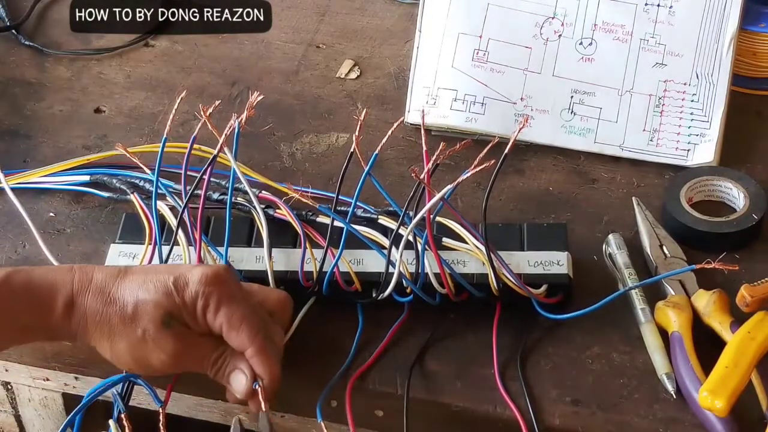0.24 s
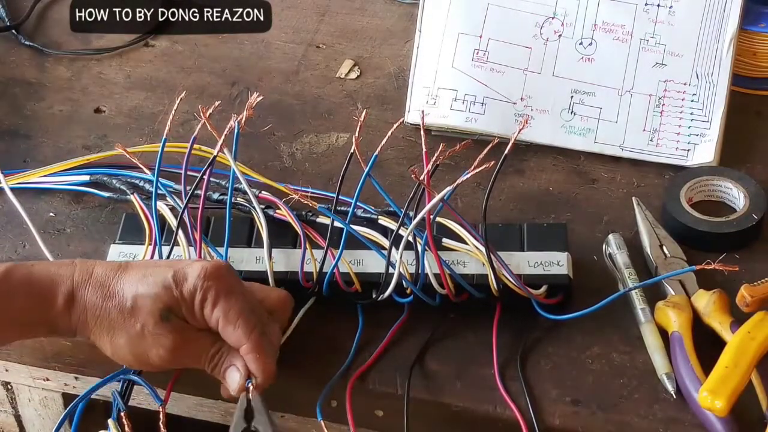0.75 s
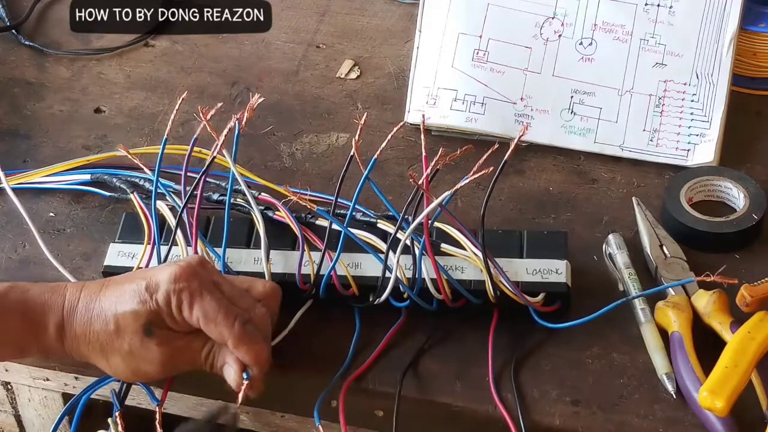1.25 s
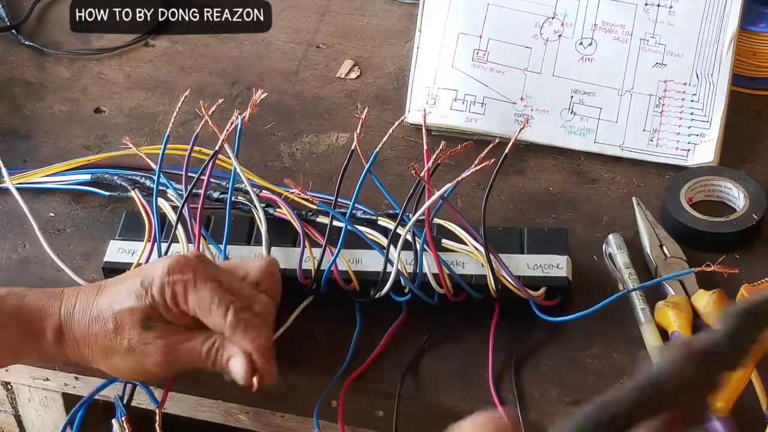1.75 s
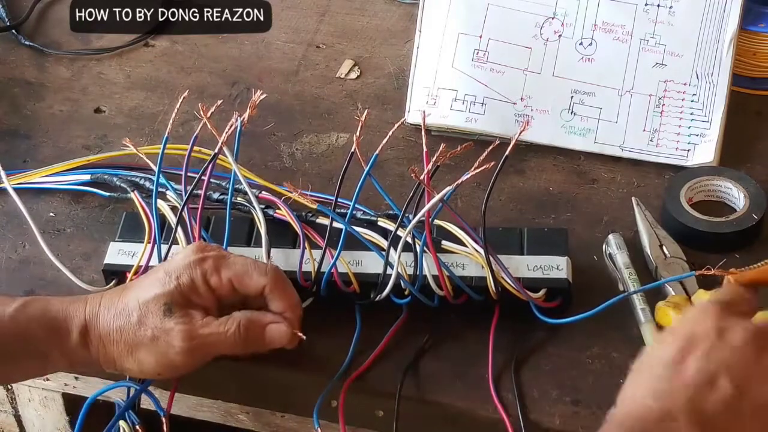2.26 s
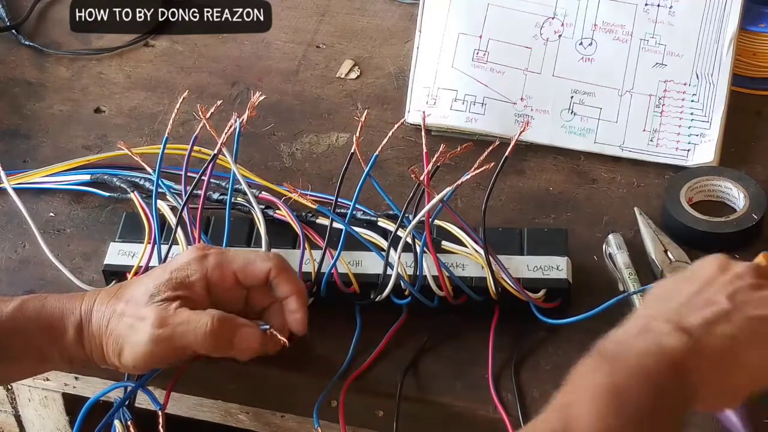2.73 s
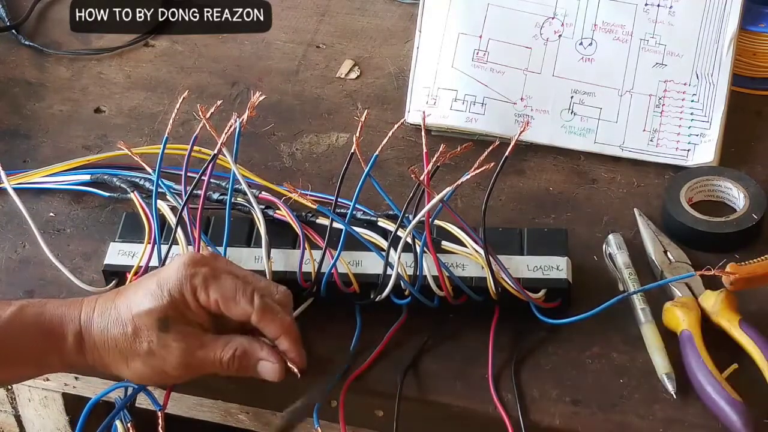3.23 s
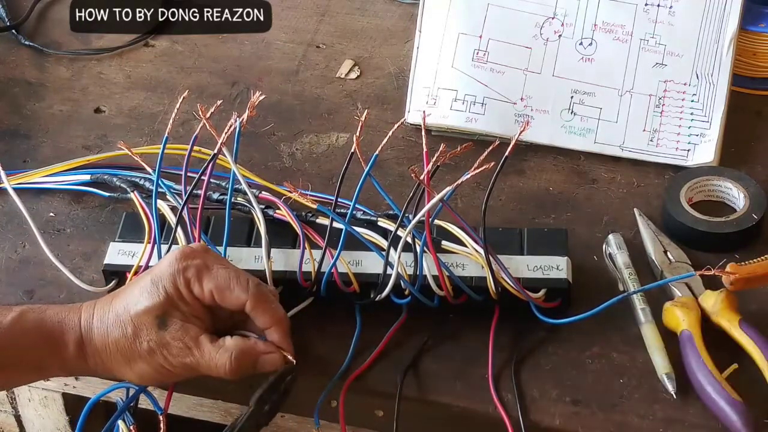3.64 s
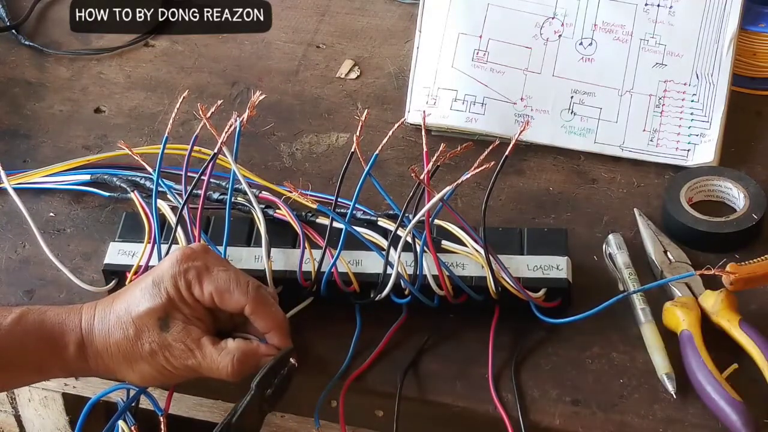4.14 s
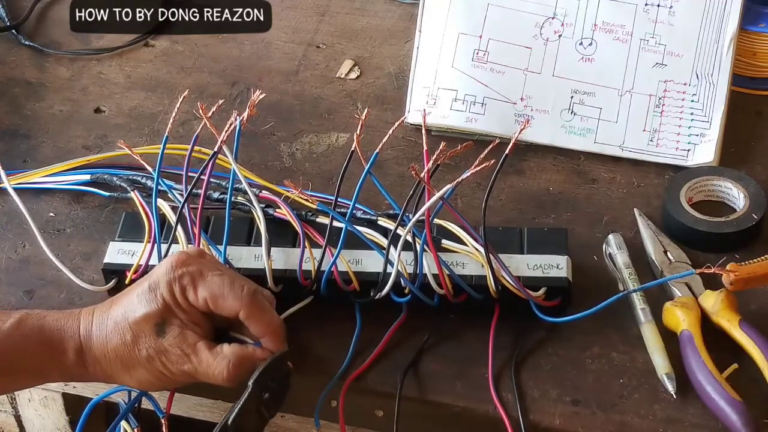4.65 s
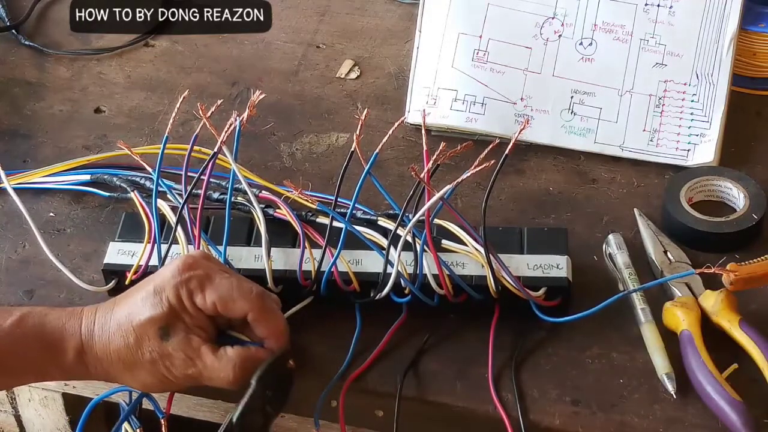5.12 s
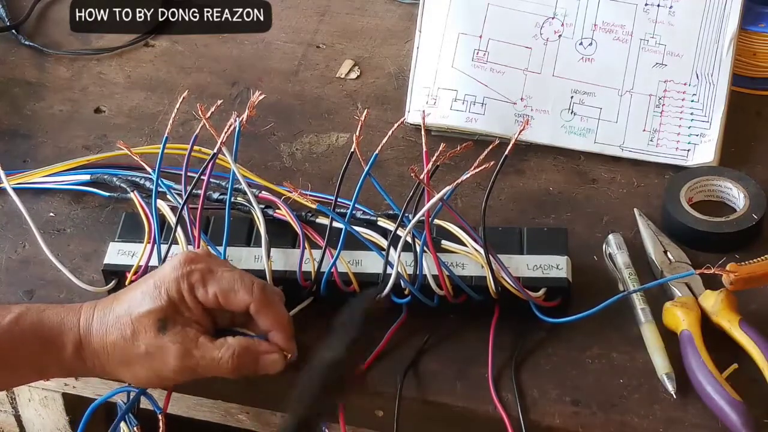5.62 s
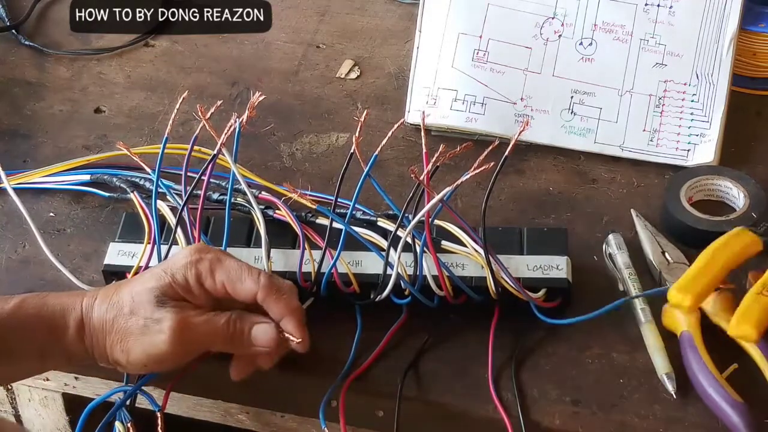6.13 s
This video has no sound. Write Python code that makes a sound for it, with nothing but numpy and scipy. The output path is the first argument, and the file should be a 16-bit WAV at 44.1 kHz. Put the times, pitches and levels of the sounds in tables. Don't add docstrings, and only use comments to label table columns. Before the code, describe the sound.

Open roadside workshop, stereo microphones close to a wooden bench. A vehicle rumbles away over faint town hum as pliers snip wire with a crisp click. At about two seconds a tool drops with a loud woody clatter and steel scrape, followed by small rattles. Later a rough engine approaches from the left, swelling strongly to the end, with a last knock as a tool is lifted.

```python
import sys
import numpy as np
from scipy import signal
from scipy.io import wavfile
from scipy.ndimage import uniform_filter1d, minimum_filter1d, map_coordinates

SR = 44100
rng = np.random.default_rng(int(sys.argv[2]) if len(sys.argv) > 2 else 0)


def wav_record(signal):
    frames = np.transpose(np.atleast_2d(signal))
    bounded = np.clip(frames, -1, 1)
    quanta = np.round(bounded * 32767).astype(np.int16)
    wavfile.write(sys.argv[1], SR, quanta)


def to_linear_factor(level_db):
    exponent = np.asarray(level_db, float) / 20
    return 10 ** exponent


N = 281358


def rms_one(x):
    return x / np.sqrt(np.mean(x ** 2) + 1e-20)


def in_time(rows):
    s, *columns = np.transpose(rows)
    return [np.interp(np.arange(N) / SR, s, c) for c in columns]


def at_hz(points, hz):
    points_hz, points_db = np.transpose(points)
    return np.interp(np.log(hz), np.log(points_hz), points_db)


def drift(rate, size=1):
    r = np.exp(-80 * np.pi * rate / SR)
    draw = rng.standard_normal(N // 40 + 2002)
    slow = signal.lfilter([1], [1, -2 * r, r * r], draw)[2000:]
    return np.interp(np.arange(0, N, size) / 40, np.arange(len(slow)), rms_one(slow))


def band(x, low_hz, high_hz):
    sos = signal.butter(2, [low_hz, min(high_hz, .45 * SR)], "band", fs=SR, output="sos")
    return signal.sosfilt(sos, x + 1e-18)


def ring(x, hz, t60):
    r, w = to_linear_factor(-60 / (t60 * SR)), 2 * np.pi * hz / SR
    return signal.lfilter([.5, 0, -.5], [1, -2 * r * np.cos(w), r * r], x + 1e-18) / np.sin(w) * w


def two_ports(x, left_leads_ms):
    n, half = np.arange(N), left_leads_ms * SR / 2000
    left = map_coordinates(x, [n + half], order=3)
    right = map_coordinates(x, [n - half], order=3)
    return np.array([left, right])


def add(out, s, piece):
    at = round(s * SR)
    out[at:at + len(piece)] += piece[:N - at]


def burst(draw, ms, rise_ms):
    t_ms = np.arange(len(draw)) / SR * 1000
    x = draw * (1 - np.exp(-t_ms / rise_ms)) ** 2 * to_linear_factor(-20 * t_ms / ms)
    return x / np.abs(x).max()


def wind():
    level = to_linear_factor(-36 - 46 * np.arange(N) / SR)
    lumps = rms_one(band(rng.standard_normal((2, N)), 8.1, 186))
    return level * lumps * to_linear_factor(np.array([[-9], [3]]))


def engine(firing_hz, level_db, loudest_hz, orders):
    phase, lines = 2 * np.pi * np.cumsum(firing_hz) / SR, 0
    coarse = slice(0, N, 8)
    for k, db in orders:
        octave_off = np.log(k * (firing_hz / loudest_hz)[coarse]) / .25
        lift_db = 4.5 * np.exp(-octave_off ** 2)
        wander_db, slip = 2.3 * drift(2, size=8), .35 * drift(1.5, size=8)
        tone = np.sin(k * phase[coarse] + slip + 4 * rng.random())
        lines = lines + to_linear_factor(db + lift_db + wander_db) * tone
    exhaust = rms_one(signal.resample_poly(lines, 8, 1)[:N])
    return to_linear_factor(level_db + 1.5 * drift(9)) * exhaust, phase


def parts(loud_db, shares):
    nearest_db = loud_db.max()
    return [db + nearest_db + share * (loud_db - nearest_db) for db, share in shares]


def traffic():
    # time_s, loudness_db
    leaving = [(0.0, -46), (0.15, -50), (0.3, -54.5), (0.8, -59), (1.15, -69), (2.1, -70.5)]
    # time_s, firing_hz, loudness_db
    coming = [(3.4, 30.15, -68.5), (3.9, 30.4, -63), (4.25, 29.27, -57.5), (4.55, 30.83, -51.5),
              (4.75, 30.97, -50.5), (4.93, 31.3, -45.5), (5.17, 31.07, -42.5), (5.26, 30.57, -42),
              (5.4, 30.9, -36.5), (5.55, 31.06, -34), (5.8, 31.17, -33), (6.05, 31.07, -31),
              (6.33, 31.1, -32)]
    # multiple_of_firing, level_db
    leaving_orders = [(1, -4), (2, -5), (3, 0), (4, -3), (5, -10), (6, -9), (7, -14), (8, -11), (9, -15),
                      (10, -16)]
    coming_orders = [(1, -20), (2, -8), (3, -13), (4, -9), (5, -5), (6, -7), (7, -10), (8, -3), (9, -2),
                     (10, 0), (11, -4), (12, -3), (13, -1), (14, -5), (15, -5), (16, -3), (22, -9),
                     (24, -8), (25, -6), (26, -5), (27, -8), (31, -10)]
    leaving_parts = [
        (-1.5, 0.66),
        (1, 1.4),
        (0, 0.53),
        (1.5, 0.63),
    ]
    coming_parts = [
        (-3, 0.61),
        (-12.5, 0.78),
        (-1, 0.78),
        (-1.5, 0.75),
    ]
    # time_s, resonance_hz
    carries = [(4, 417), (5.3, 394), (5.75, 277), (6.38, 312)]
    # time_s, left_leads_ms
    bearing = [(0, .25), (1, .22), (3.4, .26), (4.9, .32), (5.3, .37), (5.42, .41), (5.65, .465),
               (5.95, .49), (6.1, .455), (6.22, .44), (6.36, .385)]
    # pitch_hz, density_db (per Hz)
    rolling = [(18, -61), (30, -30), (146, -24), (215, -25.5), (439, -1), (487, -5), (539, -4.5), (811, -2),
               (995, -3.5), (2140, -8), (3570, -10.5), (5810, -17), (10500, -31.5), (13500, -36)]
    far_hum = [(15, -54), (25, -7), (54, 0.5), (121, -1.5), (180, -5), (241, -2), (407, -2), (746, -6.5),
               (807, -10.5), (997, -13.5), (1920, -20), (4240, -15), (11200, -30), (13500, -32)]
    # pitch_hz, left_right_likeness (-1 to 1)
    likeness = [(60, 0.012), (180, 0.2), (520, 0.64), (1520, 0.52), (4480, 0.0087), (13200, 0.0066)]
    town_db = -49.5

    t = np.arange(N) / SR
    gone, come = np.clip((3.6 - t) / 0.62, 0, 1), np.clip((t - 3.2) / 0.28, 0, 1)
    (loud_a,), (hz_b, loud_b) = in_time(leaving), in_time(coming)
    engine_a, *road_a = parts(loud_a, leaving_parts)
    engine_b, *road_b = parts(loud_b, coming_parts)
    share = np.interp(np.maximum(loud_a, loud_b), [-60, -40], [.45, .92])
    tone_a, _ = engine(np.full(N, 45), engine_a, 175, leaving_orders)
    tone_b, phase = engine(hz_b, engine_b - 3, in_time(carries)[0], coming_orders)
    puff = 1 + .15 * np.cos(phase + .8 * drift(5))
    straight, scattered = gone * tone_a + come * tone_b, 0

    white, together = rng.standard_normal((2, 3, N)), drift(3.0)
    edges = 25 * 2 ** np.arange(0, 9.3, .4)
    centres = np.sqrt(edges[1:] * edges[:-1])
    part = np.digitize(centres, [220, 1300])
    widths = np.diff(edges)
    road = to_linear_factor(at_hz(rolling, centres)) ** 2 * widths
    town = to_linear_factor(at_hz(far_hum, centres)) ** 2 * widths
    powers = [(gone * to_linear_factor(a)) ** 2 + (come * puff * to_linear_factor(b)) ** 2 for a, b in zip(road_a, road_b)]
    for k, hz in enumerate(centres):
        one, mid, side = band(white[k % 2], edges[k], edges[k + 1]) * np.sqrt(SR / 2 / widths[k])
        road_share = road[k] / road[part == part[k]].sum()
        moving = powers[part[k]] * road_share * to_linear_factor(1.0 * together + 2.6 * drift(15))
        still = to_linear_factor(town_db) ** 2 * town[k] / town.sum()
        direct = share * min(1, (4300 / hz) ** 2.5)
        alike = np.clip(at_hz(likeness, hz), -1, 1)
        spread = np.sqrt(1 + alike) * mid + np.sqrt(1 - alike) * side * [[1], [-1]]
        straight = straight + np.sqrt(direct * moving) * one
        scattered = scattered + np.sqrt((1 - direct) * moving + still) * spread / np.sqrt(2)
    return two_ports(straight, in_time(bearing)[0]) + scattered


def legs():
    # start_s, peak_db
    thumps = [
        (2.213, -25.5),
        (6.352, -30),
    ]
    frame_hz, swell_s = 97, .02
    out, t = np.zeros(N), np.arange(SR // 2) / SR
    for s, db in thumps:
        swell = t / swell_s * np.exp(1 - t / swell_s)
        add(out, s, to_linear_factor(db) * swell * np.sin(2 * np.pi * frame_hz * t))
    return out


def sliding():
    # start_s, length_s, peak_db, fade_db_per_s, above_6khz_db
    strokes = [(0.763, 0.11, -44, 200, -14), (0.764, 0.012, -38, 200, -7), (0.926, 0.016, -43.5, 202, -15),
               (2.203, 0.016, -29, 300, -7), (2.22, 0.093, -33.5, 146, -1), (2.358, 0.028, -43, 100, -7),
               (2.43, 0.011, -47, 200, -5), (2.846, 0.024, -62, 200, 7), (2.889, 0.043, -52.5, 100, 2),
               (3.05, 0.06, -50, 150, 0)]
    edge_s = 0.004
    out, t = np.zeros(N), np.arange(N) / SR
    grit = rng.standard_normal(N) * to_linear_factor(3.8 * drift(82))
    low, high = rms_one(band(grit, 3300, 6800)), rms_one(band(grit, 6100, 8800))
    for s, length, db, fade, high_db in strokes:
        on = slice(round(s * SR), round((s + length) * SR))
        since, left = t[on] - s, s + length - t[on]
        stroke = to_linear_factor(db - fade * since) * np.clip(np.minimum(since, left) / edge_s, 0, 1)
        out[on] += stroke * (low[on] + to_linear_factor(high_db) * high[on])
    return out


def bench():
    # start_s, peak_db, knock_over_boards_db, knock_hz, loudest_board_hz
    blows = [(0.768, -28, -6, 2800, 430), (0.775, -29.5, -24, 1000, 430), (0.782, -34.5, -12, 2000, 433),
             (0.795, -29.5, -16, 1510, 440), (0.926, -34, 1.5, 2600, 500), (0.933, -33.5, -7, 1210, 550),
             (1.3595, -28.5, -1, 1640, 600), (1.366, -33.5, -17, 1400, 550), (1.376, -38, -8, 1100, 600),
             (1.42, -38, -20, 1200, 436), (1.43, -37, -18, 1200, 436), (2.2025, -10, -8, 2010, 503),
             (2.2065, -7, -10, 1360, 477), (2.221, -13.5, -10, 1290, 400), (2.2255, -5.5, -19, 1400, 1000),
             (2.231, -1, -28, 2300, 533), (2.241, -14, -6, 2220, 450), (2.247, -15.5, -11, 2250, 480),
             (2.2525, -11, -18, 1300, 482), (2.261, -19, -6, 1900, 780), (2.277, -22.5, -11, 1470, 700),
             (2.286, -18.5, -17, 2800, 796), (2.304, -24, -18, 1200, 800), (2.325, -23, -10, 1150, 850),
             (2.359, -25.5, -7, 1130, 436), (2.799, -40.5, -19, 1500, 463), (3.048, -33, -5.5, 3180, 1040),
             (5.99, -22, -18, 1500, 460), (6.357, -18, -6, 2600, 500), (6.362, -19, -2, 1160, 520),
             (6.366, -19, -8, 1000, 500)]
    # pitch_hz, level_db, t60_s
    modes = [(163, -4, 0.08), (298, -4.5, 0.052), (358, -4, 0.042), (432, 4, 0.041), (500, 3.5, 0.049),
             (578, 0, 0.037), (700, -7, 0.061), (790, -1.5, 0.076), (916, -34, 0.02), (1000, -6, 0.052),
             (1140, -32, 0.03), (1270, -18, 0.02), (1400, -15, 0.02), (1700, -7, 0.029)]
    out = np.zeros(N)
    draws = rng.standard_normal((len(blows), 2, 1500))
    strengths = rng.standard_normal((len(blows), len(modes)))
    modes_hz = np.array(modes)[:, 0]
    for (s, db, knock_db, knock_hz, loudest_hz), draw, own in zip(blows, draws, strengths):
        push = np.pad(0.99 * burst(draw[0], 4.2, rise_ms=.5), (0, 2000))
        push[10] += 4
        lifts = 1.5 * own + 7 * np.exp(-(np.log(modes_hz / loudest_hz) / .3) ** 2)
        boards = 0
        for (hz, level, t60), lift in zip(modes, lifts):
            boards = boards + to_linear_factor(level + lift) * ring(push, hz, min(t60, .065))
        boards = band(boards, 240, 2000)
        knock = band(burst(draw[1], 9.9, rise_ms=.4), knock_hz / 1.25, knock_hz * 1.25)
        add(out, s, to_linear_factor(db) * boards / np.abs(boards).max())
        add(out, s, to_linear_factor(db + knock_db) * knock / np.abs(knock).max())
    return out


def pliers():
    # start_s, peak_db, under_6khz_db, over_9khz_db, ring_hz
    ticks = [(0.7644, -33, -41, -50, 6340), (0.8413, -41, -47, -62, 6300), (0.9261, -42, -43, -64, 3860),
             (2.203, -39, -25.5, -42, 6000), (2.2236, -58, -23.5, -43, 4600), (2.2951, -28, -38, -38, 7800),
             (2.3235, -28, -40, -49, 8600), (2.3472, -26.5, -40, -40, 6440), (2.3672, -37, -45, -62, 4640),
             (2.4353, -42, -42.5, -58, 2998), (2.778, -48, -50, -75, 4880), (2.811, -42, -64.5, -69, 6400),
             (2.8856, -43, -44, -59, 5020), (2.8992, -39, -42, -60, 6800), (2.921, -41, -48, -63, 8000),
             (2.992, -38, -48, -54, 4910), (3.0472, -35.5, -41.5, -38, 8250),
             (6.313, -26.5, -33.5, -56, 5560), (6.359, -29, -36, -59, 4880)]
    # pitch_hz, level_db, t60_s
    jaws = [(2800, -9, 0.031), (3580, -7, 0.023), (4350, -4, 0.015), (5150, -4, 0.013), (6200, 6, 0.036),
            (6600, 4, .035), (7440, -2, 0.044), (7870, 2, 0.036), (11000, -1, 0.011), (12500, -19, .015)]
    snip_s, snip_db = .7655, -31.5
    out = np.zeros(N)
    draws = rng.standard_normal((len(ticks), 2500))
    echoes = rng.integers(9, 24, len(ticks))
    for (s, db, low_db, high_db, hz), draw, echo in zip(ticks, draws, echoes):
        crack = burst(draw, 4 * np.exp(.2 * draw[0]), rise_ms=.1)
        crack = crack + .2 * np.roll(crack, echo)
        low, high = band(crack, 2800, 6000), band(crack, 9000, 14000)
        middle = band(crack, 6000, 9000) + to_linear_factor(-40) * ring(crack, hz, .03)
        for level, piece in (low_db + 11, low), (db, -middle), (high_db + 13, high):
            add(out, s, to_linear_factor(level) * piece / np.abs(piece).max())
    click = np.pad(.25 * burst(draws[0, ::-1], 6, rise_ms=.2), (0, 3000))
    for k, (hz, db, t60) in enumerate(jaws):
        add(out, snip_s, (-1) ** k * to_linear_factor(snip_db + db) * ring(click, hz, t60))
    return out


def clutter(x):
    port_lags = [
        (11, 31),
        (17, 27),
    ]
    out = []
    for wave, lags in zip(x, port_lags):
        for lag in lags:
            loop = np.r_[1, np.zeros(lag - 1), -.4]
            wave = signal.lfilter(loop[::-1], loop, wave + 1e-18)
        out.append(np.r_[wave[60:], np.zeros(60)])
    return np.array(out)


def shed(x):
    t60_s, treble_db = 0.39, 0
    t = np.arange(SR // 2) / SR
    noise = rng.standard_normal((2, len(t))) * np.clip(t / .008, 0, 1)
    alike = noise + 0.9 * noise[::-1]
    low = (0.54 * band(alike, 38, 630) + band(noise[::-1], 590, 2600)) * to_linear_factor(-60 * t / t60_s)
    high = band(noise, 2100, 7800) * to_linear_factor(-60 * t / (0.88 * t60_s))
    tail = (rms_one(low) * 0.5 + rms_one(high) * to_linear_factor(treble_db)) / np.sqrt(len(t))
    return signal.fftconvolve(x[None], tail, axes=1)[:, :N]


def scene():
    # time_s, right_leads_ms
    hand = [(1.5, .052), (2.1, .14), (2.45, .115), (3.1, .1), (6.2, .02)]
    thump, hiss, dull, bright = legs(), sliding(), bench(), pliers()
    on_bench = clutter(two_ports(dull + hiss + .35 * bright, -.11))
    in_hand = two_ports(bright, -in_time(hand)[0])
    reflected = to_linear_factor(-4) * shed(dull + .2 * thump + .4 * (bright + hiss))
    return traffic() + wind() + on_bench + in_hand + thump + reflected


def hush(x):
    turn = np.array([[1, 0.99], [1, -1.003]]) / np.sqrt(2)
    cells = signal.stft(turn @ x, nperseg=1024)[2]
    power = np.abs(cells) ** 2 + 1e-20
    around = uniform_filter1d(power, size=21, axis=1)
    floor = minimum_filter1d(around, size=41, axis=2)
    steady = np.clip(8 * floor / around, 0, 1)
    gain = (power / around) ** (steady * .56 / 2)
    gain = gain * np.sqrt(around / uniform_filter1d(power * gain ** 2, size=21, axis=1))
    return turn @ signal.istft(cells * gain, nperseg=1024)[1][:, :N]


def low_pass(x):
    return signal.sosfilt(signal.butter(12, 13780, fs=SR, output="sos"), x)


def record(dry):
    cut = signal.cheby2(12, 60, 13850, fs=SR, output="sos")
    mix = signal.sosfilt(cut, hush(dry))
    return low_pass(mix)


dry = scene()
out = record(dry)
wav_record(out)
```